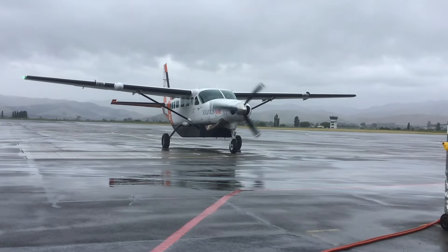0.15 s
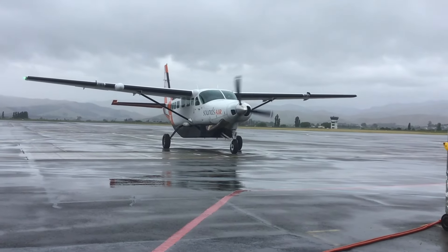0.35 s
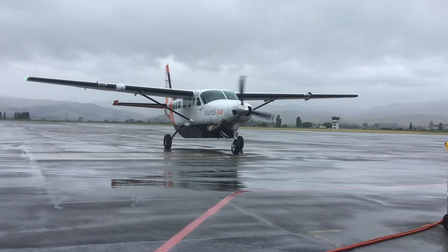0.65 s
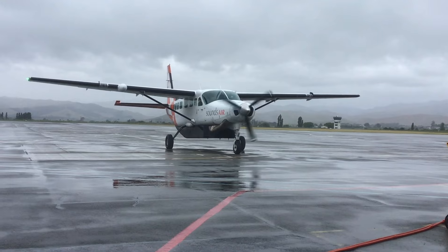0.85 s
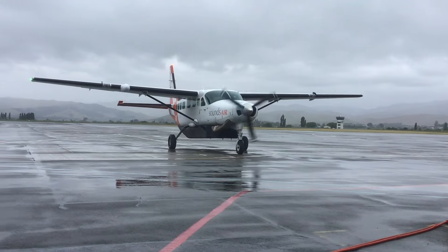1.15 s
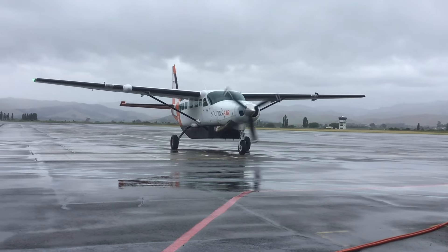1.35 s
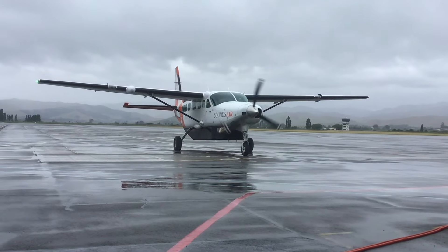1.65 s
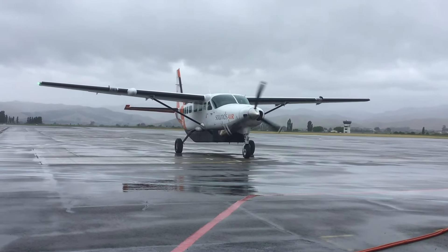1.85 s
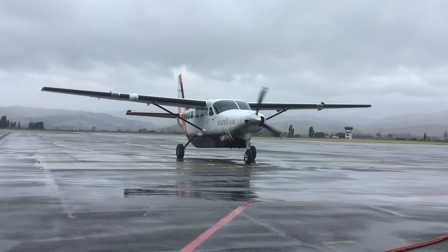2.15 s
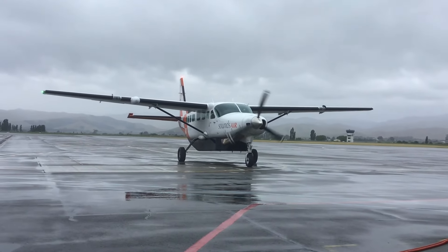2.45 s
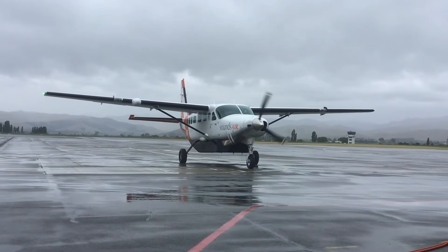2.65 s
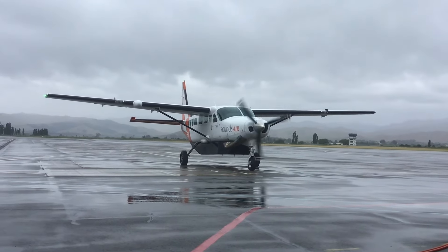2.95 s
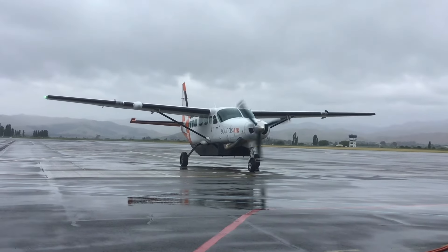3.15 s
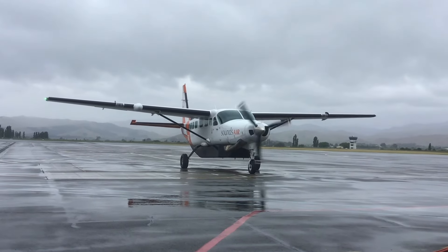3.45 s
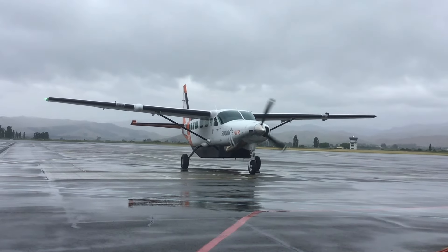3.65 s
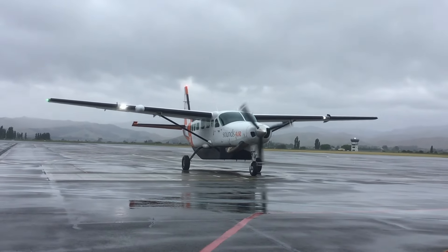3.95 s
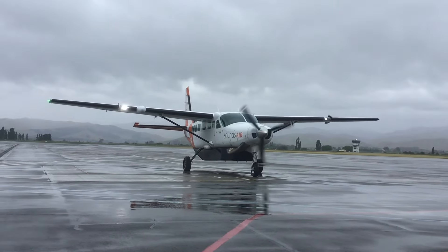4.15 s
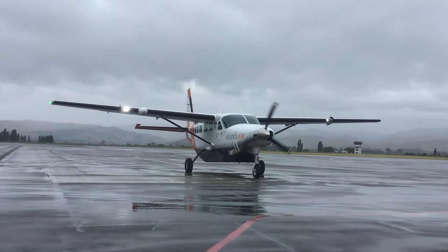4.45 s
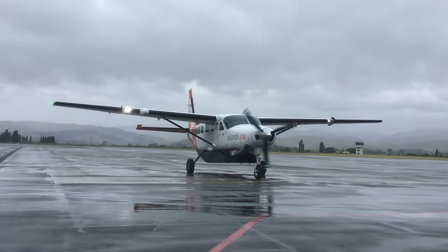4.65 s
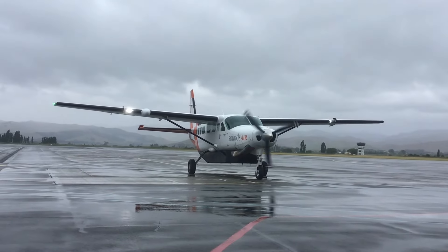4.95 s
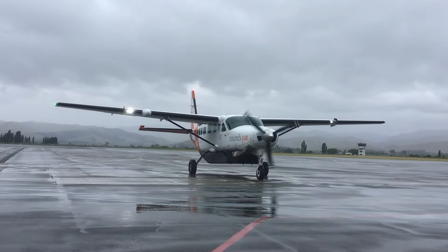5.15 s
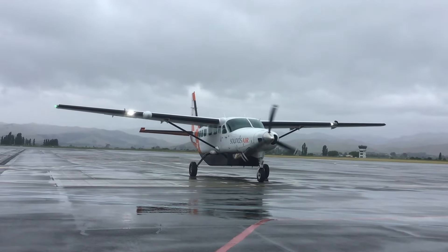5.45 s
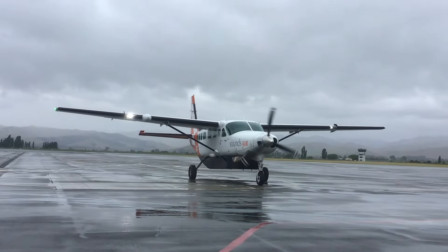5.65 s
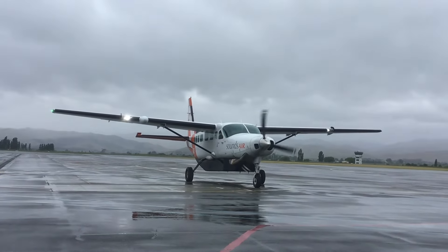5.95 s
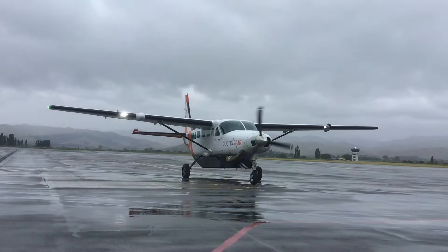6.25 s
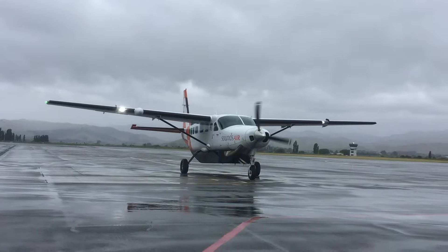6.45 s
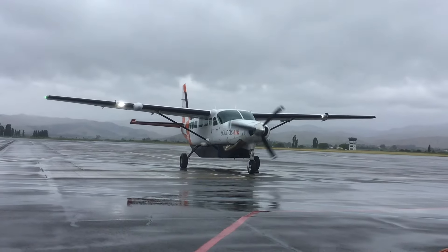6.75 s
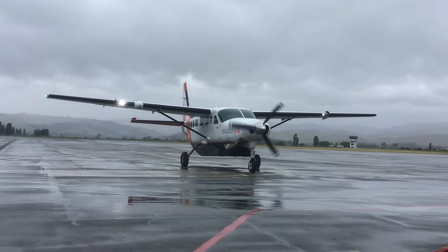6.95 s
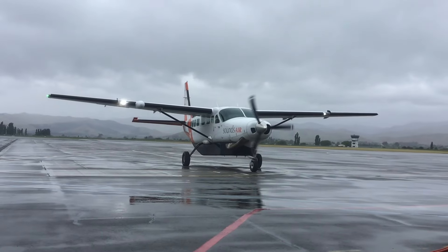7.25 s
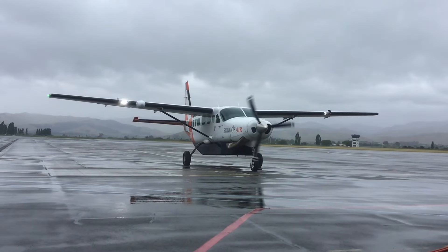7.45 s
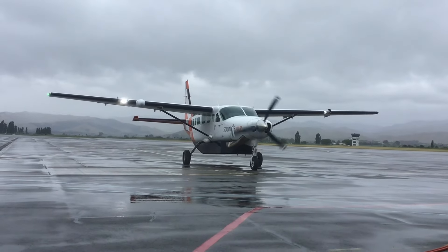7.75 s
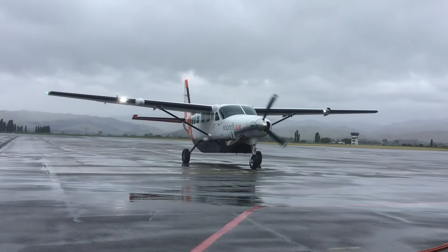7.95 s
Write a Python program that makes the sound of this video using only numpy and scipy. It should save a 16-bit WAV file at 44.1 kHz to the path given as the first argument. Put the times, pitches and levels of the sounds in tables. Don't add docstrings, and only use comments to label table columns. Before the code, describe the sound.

A small single-engine turboprop plane idles on an open wet apron, heard from some distance. Rapid propeller slaps merge into a low, uneven fluttering drone, under a hollow mid-high intake howl, rushing exhaust and hiss. A thin, high turbine whistle flickers in and out, clearest in the first few seconds. Light low wind buffets the microphone. The sound is continuous, essentially mono, with no start or stop.

```python
import sys
import numpy as np
from scipy import signal
from scipy.fft import rfft, irfft, next_fast_len
from scipy.io import wavfile
from scipy.ndimage import uniform_filter1d, map_coordinates

SR = 44100
rng = np.random.default_rng(int(sys.argv[2]) if len(sys.argv) > 2 else 0)


def elevation(decibels):
    levels = np.asarray(decibels, float)
    return 10 ** (levels / 20)


def to_wav(sig):
    pcm = np.clip(np.atleast_2d(sig), -1, 1) * 32767
    pcm = np.round(pcm).astype(np.int16)
    wavfile.write(sys.argv[1], SR, pcm.T)


N = 356769

# (time [s], level [dB])
WIND_LEVEL = [(0.0, -43), (0.45, -46), (0.47, -35.5), (1.13, -42), (1.45, -50), (1.65, -40), (2.7, -42.5),
              (3.5, -42), (4.03, -50), (5.61, -44), (6.06, -51), (8.09, -46)]
# (frequency [Hz], density [dB per Hz])
WIND_SPECTRUM = [(30, -1), (42, -6), (70, 7.5), (110, -1.5), (200, 2.5), (400, -61)]
# (middle [s], low edge [Hz], high edge [Hz], level [dB])
STRAY_BANDS = [
    (4.372, 5000, 6500, -41),
    (4.396, 7500, 9200, -45),
    (4.558, 8200, 9900, -45),
    (6.392, 6100, 7800, -42),
    (6.808, 4100, 5400, -36),
]

# (frequency [Hz], width [Hz], level [dB])
DUCT_MODES = [(1790, 50, -8), (1915, 40, -4.5), (2070, 80, -10), (2200, 80, -7), (2315, 70, -1.5),
              (2390, 50, -8), (2488, 40, 0), (2575, 70, -2), (2725, 60, -4.5), (2815, 45, -8),
              (2968, 45, -13), (3168, 65, -11.5), (3560, 80, -19), (4240, 120, -17)]
# (middle [s], length [s], gain [dB])
DUCT_SWELLS = [(.05, 0.24, 6), (.3, .15, -1.5), (.6, .2, 1), (1.75, .2, -1), (2.1, .15, 4), (2.5, .2, -3),
               (3.15, .15, -3), (3.4, .2, -2), (4.15, .25, 1), (4.55, .1, 3), (4.95, .2, -1.5),
               (5.6, .15, -1.5), (5.85, 0.17, 1), (6.5, 0.42, 1.5), (6.9, 0.28, 1), (7.15, 0.062, -2.5),
               (7.55, .25, -2), (7.9, .25, 1)]
# (time [s], share [0-1])
INTAKE_FACING = [
    (0, 0.36),
    (.6, 1),
    (1.05, 0.52),
    (2.3, 0),
    (2.9, 0.7),
    (3.7, 0.73),
    (4, 0.99),
    (7.3, 1),
    (7.6, 0.9),
    (8.09, 0.93),
]
# (frequency [Hz], density [dB per Hz])
ROAR_SPECTRUM = [(820, -56), (1400, -18), (1610, -18.5), (1860, -5.5), (2280, -3), (2560, -10),
                 (3360, -6.5), (4580, -5), (4930, -11), (5400, -14), (7020, -27), (11900, -120)]
SAG_TIMES = (6.0, 6.6, 7.1, 7.7)
SAG_GAINS = (-0.13, -4.5, -1.7, -0.65)
# (time [s], level [dB])
RASP_LEVEL = [(0, -41), (.25, -43), (.6, -44), (.75, -60), (1.05, -50), (1.2, -38), (1.45, -65),
              (1.75, -50), (1.9, -46), (2.9, -42), (3.3, -42), (4.5, -36), (4.95, -39.5), (5.9, -37),
              (6.5, -38), (7.1, -37.5), (7.6, -40), (8.09, -39)]
# (frequency [Hz], density [dB per Hz])
HISS_SPECTRUM = [(3060, -16.5), (5200, -3), (5800, -1.5), (6610, 0), (8390, -6), (10000, -1.5),
                 (10500, -4.5), (12800, -21), (14400, -21), (15200, -23), (15700, -24.5)]
# (middle [s], length [s], gain [dB])
TREBLE_GUSTS = [(.14, 0.12, 2), (.41, 0.21, 3.5), (.67, 0.1, -5), (.8, 0.16, -1.5), (.08, .1, -0.5),
                (1.17, .08, -1.5), (1.78, .08, -2.5), (2.43, 0.29, -1), (7.24, .08, 1), (5.99, .2, 0.7),
                (.33, .08, 1), (1.15, 0.51, 1.5), (1.45, 0.17, 1), (1.62, 0.057, 2), (1.85, 0.21, -2),
                (2.2, 0.19, -2.5), (2.72, 0.14, 3), (3.03, 0.14, 0), (3.2, 0.078, 4.5), (3.45, 0.42, -1.5),
                (3.78, 0.23, 2), (4.1, .2, 0.5), (4.62, 0.3, 3), (4.9, .15, -1.5), (5.05, 0.13, 2),
                (5.58, 0.16, -0.5), (5.78, 0.18, 2), (6.05, 0.36, 2), (6.4, 0.14, -1), (6.75, 0.23, 2),
                (7.1, .2, 0.5), (7.4, 0.26, 1.5), (7.85, 0.18, -1.5)]
# (middle [s], length [s], gain [dB])
TREBLE_SHIMMER = [(0.66, 0.08, 5), (0.93, 0.08, -2.9), (1.13, 0.12, 1.9), (1.56, 0.12, 2), (2.09, 0.3, 1),
                  (2.3, 0.08, 4), (2.59, 0.08, 0.5), (2.69, 0.08, -2.6), (3.04, 0.08, -4.5),
                  (4.09, 0.08, -5.4), (4.24, 0.08, 2.1), (4.43, 0.12, -1), (4.81, 0.12, -1),
                  (5.16, 0.12, 2), (5.36, 0.12, -2.4), (5.9, 0.08, -2.7), (6.29, 0.3, -2.2),
                  (6.65, 0.2, -1), (7.09, 0.08, -2.5), (7.31, 0.12, -2.4)]

SPOOL_HZ, CLIMB_HZ_PER_S, GOVERNED_HZ = 4958, 5.05, 4979.5
# (middle [s], length [s], level [dB])
TONE_SPELLS = [(.18, 0.2, -37.5), (1.15, 0.55, -36), (1.62, 0.12, -35), (2.02, .1, -35), (2.25, 0.36, -34),
               (2.52, .2, -38), (2.8, 0.36, -32.5), (3.04, .16, -34), (3.35, 0.26, -38), (3.9, 0.12, -50),
               (4.25, .36, -40.5), (5.05, 0.73, -43), (5.8, 0.32, -45), (6.25, 0.15, -43), (7.45, 0.3, -41),
               (7.95, 0.55, -42)]
# (middle [s], length [s], level [dB])
OVERTONE_SPELLS = [(.18, 0.18, -47), (.7, 0.16, -56), (1.3, .25, -49), (1.65, .15, -56), (2.6, 0.5, -45),
                   (3.35, 0.34, -52), (4.25, .3, -56), (5.1, 0.22, -55), (5.9, 0.38, -50), (6.45, .15, -60),
                   (6.8, .2, -53), (7.4, .3, -51), (8.0, 0.45, -50)]
# (multiple of blade rate, level [dB], share of the early family [0-1])
SIDEBAND_TONES = [
    (-3, -15, 0.6),
    (-2, -22, 0),
    (-1, -12, 0),
    (1, -5.5, 0.84),
    (2, -14, 1),
    (2, -13, 0.3),
]
# (middle [s], length [s], level [dB])
EARLY_SPELLS = [
    (.42, .6, -33.5),
    (1.2, .3, -41),
    (1.65, 0.17, -52),
    (2.2, 0.68, -32.5),
    (2.9, 0.35, -34),
    (7.25, .3, -48),
]
# (middle [s], length [s], level [dB])
LATE_SPELLS = [
    (.2, .3, -49),
    (2.2, 0.93, -33),
    (4.25, 0.4, -34),
    (5.9, 0.41, -39),
    (6.5, 0.91, -34),
    (7.1, 0.66, -45),
    (7.92, 0.22, -28),
    (6.0, 1.5, -51),
]
# (width [Hz], level over the hiss [dB])
TONE_HAZE = [
    (170, -7),
    (180, -17.5),
    (190, -24.5),
]

# (time [s], rate [Hz])
BLADE_RATE = [(0.0, 44.721), (0.6, 44.785), (1.2, 44.847), (1.8, 44.873), (2.5, 44.869), (3.2, 44.855),
              (3.9, 44.937), (4.5, 45.16), (5.2, 45.426), (5.9, 45.562), (6.6, 45.487), (7.3, 45.293),
              (8.09, 45.084)]
# (time [s], load level [dB], blade tips over the load [dB])
PROPELLER_LOAD = [(0.0, -29, -15.5), (0.34, -19, -22.5), (0.85, -26, -22), (0.97, -22, -23.5),
                  (1.45, -20.5, -19.5), (2.1, -20.5, -23), (2.77, -22, -23), (3.04, -25.5, -16.5),
                  (3.74, -25, -22), (3.95, -22.5, -21), (4.4, -25, -22.5), (4.6, -30.5, -14.5),
                  (6.2, -29, -16.5), (6.6, -23.5, -17), (7.5, -21, -21), (7.65, -27, -15.5),
                  (7.8, -22, -17.5), (8.09, -19, -22)]
# (time [s], gustiness [0-1])
INFLOW_GUSTS = [(0, .9), (.3, .65), (.45, .65), (.52, 1.15), (.62, .8), (.72, .9), (.85, 1.25), (.95, .6),
                (2.2, .55), (3.7, .65), (3.9, .4), (4.45, .4), (4.6, .95), (6.3, .9), (6.5, .3), (8.09, .4)]
# (time [s], gain over their neighbours [dB])
HARD_EDDIES = [(0.117, 0), (0.274, 4.5), (0.341, 7.5), (0.452, 5), (0.564, 1), (1.523, 6.5), (1.568, 4.1),
               (1.791, 5.5), (2.214, 9), (2.482, 1), (2.571, 6), (2.727, 8), (2.816, 7), (2.883, 7),
               (3.039, 3), (3.15, 7), (3.195, 6), (3.239, 9), (3.373, 6), (3.418, 4), (3.64, 6), (3.752, 5),
               (3.819, 13), (3.93, 6), (4.108, 6.0), (4.285, 6.6), (4.463, 2), (4.573, 6), (4.839, 7),
               (4.861, 4.4), (5.169, -2), (5.257, -6), (5.323, -1), (5.433, 0), (5.763, 7), (5.983, -3),
               (6.027, 5), (6.356, 2), (6.554, 2), (7.016, 2), (7.391, 4.9), (7.435, 4), (7.634, 4),
               (7.723, 3), (7.856, 0)]
# (frequency [Hz], level [dB])
PULSE_SPECTRUM = [(30, -60), (50, -22), (90, -6.5), (135, -3.5), (180, 1), (220, 0), (320, 1), (365, -2),
                  (410, -21.5), (500, -14.5), (580, -14), (800, -15.5), (1000, -27.5), (1600, -33.5),
                  (3000, -58)]
# (frequency [Hz], density [dB per Hz])
WASH_SPECTRUM = [(41, -41), (70, -20), (160, -0.5), (347, -4.5), (376, -2.5), (408, -3.5), (442, -11.5),
                 (532, -3.5), (625, -2.5), (1200, -13.5), (1590, -15.5), (1700, -13.5), (2210, -45),
                 (3740, -120)]
# (middle [s], length [s], frequency [Hz], gain [dB])
FOCUSING_POCKETS = [(0.14, 0.08, 157, 7), (0.16, 0.06, 376, 8.6), (0.29, 0.44, 89, 9.5),
                    (0.3, 0.59, 193, 5), (0.41, 0.099, 236, 10.5), (0.68, 0.043, 325, 6),
                    (0.68, 0.07, 176, 4), (0.93, 0.08, 308, 6), (0.95, 0.65, 240, 5), (1.07, 0.16, 133, 13),
                    (1.24, 0.052, 156, 12), (1.49, 0.12, 288, 7.5), (1.5, 0.082, 143, 7),
                    (1.97, 0.37, 226, 3), (2.12, 0.34, 110, 7), (2.12, 0.28, 296, 9), (2.44, 0.061, 121, 9),
                    (2.79, 0.17, 242, 9.5), (2.98, 0.64, 329, 7.5), (3.32, 0.13, 210, 6),
                    (3.34, 0.7, 94, 4), (3.44, 0.47, 230, 5), (3.55, 0.1, 285, 5), (3.88, 0.18, 370, 8),
                    (3.9, 0.29, 193, 11), (4.23, 0.18, 169, 7.5), (4.25, 0.41, 334, 7),
                    (4.4, 0.14, 242, 14), (4.55, 0.43, 119, 17.5), (4.75, 0.092, 313, 11.5),
                    (4.92, 0.15, 196, 15.5), (5.11, 0.32, 130, 11.5), (4.9, .3, 362, 4.5),
                    (5.6, 0.13, 365, 7.5), (5.41, 0.19, 93, 8), (5.66, 0.38, 175, 6),
                    (5.78, 0.21, 233, 13.5), (5.86, 0.26, 159, 16), (6.21, 0.19, 126, 10),
                    (6.3, 0.12, 310, 9), (6.52, 0.13, 188, 14), (6.63, 0.31, 338, 9.5),
                    (6.79, 0.25, 274, 10.5), (6.98, 0.17, 360, 5.5), (7.32, 0.63, 118, 9),
                    (7.43, 0.76, 187, 3), (7.67, 0.13, 156, 11), (7.73, 0.06, 350, 7.5),
                    (7.79, 0.11, 298, 7.5)]
# (middle [s], length [s], frequency [Hz], gain [dB])
CANCELLING_POCKETS = [(0.25, 0.22, 223, -16), (0.28, 0.19, 105, -14), (0.46, 0.16, 258, -16),
                      (0.49, 0.093, 147, -17), (0.71, 0.1, 226, -13), (1.11, 0.12, 104, -18),
                      (1.16, 0.15, 352, -8), (1.29, 0.084, 230, -10), (2.05, 0.3, 309, -8.5),
                      (2.15, 0.13, 87, -10), (2.18, 0.055, 193, -12), (2.43, 0.79, 250, -1.5),
                      (2.55, .25, 355, -4), (2.86, 0.16, 129, -10), (2.96, 0.072, 291, -7),
                      (3.15, 0.23, 132, -14), (3.41, 0.06, 339, -8), (3.75, 0.095, 176, -31),
                      (3.9, 0.19, 165, -19), (4.23, 0.11, 322, -13), (4.33, 0.24, 104, -19),
                      (4.35, 0.16, 190, -19), (4.52, 0.11, 290, -5), (4.87, 0.33, 147, -8),
                      (5.25, 0.29, 292, -9), (5.83, 0.18, 194, -26), (6.59, 0.19, 166, -12),
                      (6.67, 0.13, 326, -6), (6.84, 0.28, 235, -13), (7.14, 0.1, 330, -9),
                      (7.25, 0.073, 184, -6), (7.44, 0.62, 91, -9.5), (7.73, 0.17, 147, -17),
                      (7.93, 0.055, 312, -12), (.8, 0.12, 140, -9), (.55, 0.086, 100, -14),
                      (5.95, 0.37, 310, -3), (.52, 0.17, 318, -3), (5.45, 0.13, 318, -1)]
# (middle [s], length [s], frequency [Hz], gain [dB])
SNAP_POCKETS = [(0.96, 0.15, 530, 7), (1.08, 0.13, 800, -12), (1.48, 0.4, 800, 0), (1.572, 0.12, 530, -8),
                (1.783, 0.28, 714, -4.5), (2.128, 0.16, 805, 3.6), (2.29, 0.25, 530, 1),
                (2.68, 0.15, 530, -0.5), (3.64, 0.46, 740, -3), (4.17, 0.15, 800, -3.3),
                (4.28, 0.15, 620, 2.3), (4.54, 0.15, 800, 3), (5.03, 0.15, 530, 2), (5.13, 0.4, 710, -9),
                (5.51, 0.13, 530, -3.7), (5.72, 0.14, 623, 2.5), (5.892, 0.13, 710, 4.5),
                (6.09, 0.13, 800, -10), (6.09, 0.27, 530, -7), (6.53, 0.25, 670, 2.5),
                (6.76, 0.14, 710, -1), (6.96, 0.18, 530, -0.5), (7.11, 0.15, 710, -1.5),
                (7.29, 0.17, 800, 4.5), (7.534, 0.45, 533, -3.5), (8.03, 0.13, 530, -0.5)]
SNAP_CENTRES = (530, 620, 710, 800)
SNAP_REACH_HZ, POCKET_REACH_HZ, BLADE_HZ = 90, 27, 45
FRAME = 64


def unit(x):
    return x / np.sqrt(np.mean(x ** 2) + 1e-20)


def along(points, hz):
    f, v = np.transpose(points)
    return np.interp(np.log(hz + 1), np.log(f + 1), v)


def curves(rows):
    s, *columns = np.transpose(rows)
    return [np.interp(np.arange(N) / SR, s, column) for column in columns]


def wobble(rate):
    return map_coordinates(rng.standard_normal(1000), [np.arange(N) * rate / SR])


def filtered(x, response):
    m = next_fast_len(N + SR // 2)
    return irfft(rfft(x, m) * response(np.fft.rfftfreq(m, 1 / SR)), m)[..., :N]


def rush(gain, patchy_db):
    z = signal.stft(rng.standard_normal(N), nperseg=512)[2]
    field = uniform_filter1d(rng.standard_normal(z.shape), size=6, axis=0)
    field = uniform_filter1d(field, size=12, axis=1)
    patchy = signal.istft(z * elevation(patchy_db * unit(field)), nperseg=512)[1][:N]
    return unit(filtered(patchy, gain))


def between(hz, lo_hz, hi_hz):
    def edge(corner_hz):
        return np.clip(.5 + 4 * np.log((hz + 1) / corner_hz), 0, 1)
    return edge(lo_hz) - edge(hi_hz)


def spells(rows):
    s, length, db = np.transpose(rows)[:, :, None]
    t = np.arange(0, N, FRAME) / SR
    return np.exp(-.5 * (2.36 * (t - s) / length) ** 2), db


def per_sample(values):
    return np.repeat(values, FRAME)[:N]


def heard_db(rows, between_db):
    bell, db = spells(rows)
    return per_sample(20 * np.log10(elevation(between_db) + np.sum(elevation(db) * bell, axis=0)))


def gust_db(rows=TREBLE_GUSTS):
    bell, db = spells(rows)
    return per_sample(np.sum(db * bell, axis=0))


def pockets_db(hz, rows=list(FOCUSING_POCKETS) + list(CANCELLING_POCKETS), reach_hz=POCKET_REACH_HZ):
    rows = np.array(rows)
    bell, _ = spells(rows[:, :3])
    reach = np.exp(-.5 * ((rows[:, 2] - hz) / reach_hz) ** 2)
    return per_sample((rows[:, 3] * reach) @ bell)


def turns():
    return np.cumsum(curves(BLADE_RATE)[0]) / SR + .76


def chop(depth_db, lead):
    return elevation(depth_db * np.cos(2 * np.pi * (turns() + lead)))


def stray_noise():
    t = np.arange(N) / SR
    length_s = .046
    side = np.zeros(N)
    for s, lo, hi, db in STRAY_BANDS:
        noise = filtered(rng.standard_normal(N), lambda hz: (hz > lo) & (hz < hi))
        fade = np.clip(3 - 6 * np.abs(t - s) / length_s, 0, 1)
        side += elevation(db - 2) * fade * unit(noise)
    return np.array([side, -side])


def wind():
    level_db = curves(WIND_LEVEL)[0] + 8.0 + 0.57 * wobble(2.7)
    return elevation(level_db) * rush(lambda hz: elevation(along(WIND_SPECTRUM, hz)), patchy_db=-2.0)


def duct_response(hz):
    return np.sqrt(sum(elevation(2 * db) / (1 + (2 * (hz - centre) / width) ** 2) ** 1.37
                       for centre, width, db in DUCT_MODES))


def intake_howl(facing, sag_db):
    def ringing(lo_hz, hi_hz, patchy_db):
        return rush(lambda hz: duct_response(hz) * between(hz, lo_hz, hi_hz), patchy_db)

    low_db = -37.5 + 0.87 * sag_db + 0.68 * wobble(1.44)
    middle_db = -39.0 + 5.15 * facing
    high_db = -39.5 + 7.6 * facing + 0.87 * wobble(3.17) + gust_db(DUCT_SWELLS)
    howl = elevation(low_db) * ringing(100, 2190, patchy_db=0.5)
    howl += elevation(middle_db) * ringing(2080, 2370, patchy_db=1.5)
    howl += elevation(high_db) * ringing(2310, 30000, patchy_db=1.3)
    return chop(1.44, lead=0.034) * howl


def exhaust(facing, sag_db):
    def hissing(lo_hz, hi_hz, patchy_db):
        return rush(lambda hz: elevation(along(HISS_SPECTRUM, hz)) * between(hz, lo_hz, hi_hz), patchy_db)

    roar_db = -33.5 - 1.7 * facing + sag_db + 0.6 * wobble(3)
    roar = rush(lambda hz: elevation(along(ROAR_SPECTRUM, hz)), patchy_db=1.5)
    roar = elevation(roar_db) * chop(0.68, lead=0.36) * roar
    rasp_db = curves(RASP_LEVEL)[0] + 0.44 * gust_db()
    rasp = elevation(rasp_db) * rush(lambda hz: 1 / (1 + ((hz - 4550) / 420) ** 4), patchy_db=3.0)
    hiss = elevation(-36.5 + 1.02 * gust_db()) * hissing(100, 9900, patchy_db=1.73)
    sizzle_db = -49.0 + 1.3 * np.minimum(gust_db(), 2.4) + 0.98 * gust_db(TREBLE_SHIMMER) + 0.89 * wobble(20)
    sizzle = elevation(sizzle_db) * hissing(10970, 30000, patchy_db=2.0)
    gusts = elevation(0.42 + 0.34 * wobble(9.8)) * chop(0.94, lead=0.71)
    return roar + rasp + gusts * (hiss + sizzle)


def gas_stream():
    facing = curves(INTAKE_FACING)[0]
    sag_db = np.interp(np.arange(N) / SR, SAG_TIMES, SAG_GAINS)
    return intake_howl(facing, sag_db) + exhaust(facing, sag_db)


def compressor():
    hz = np.minimum(SPOOL_HZ + CLIMB_HZ_PER_S * np.arange(N) / SR, GOVERNED_HZ)
    phase = 2 * np.pi * np.cumsum(hz) / SR
    tone_db = heard_db(TONE_SPELLS, -66)
    faint = np.clip((-37 - tone_db) / 7, .12, 1)
    out = elevation(tone_db + 1.6 * faint * wobble(22)) * np.sin(phase + 0.4 * faint * wobble(60))
    second_db = heard_db(OVERTONE_SPELLS, -55.5) + 3.2 * wobble(25)
    out += elevation(second_db) * np.sin(2 * phase + 0.8 * wobble(40))

    early_level, late_level = elevation(heard_db(EARLY_SPELLS, -86)), elevation(heard_db(LATE_SPELLS, -86))
    for k, db, early in SIDEBAND_TONES:
        flicker = elevation(db + 1.6 * wobble(24)) * (early * early_level + (1 - early) * late_level)
        beside = phase + 2 * np.pi * k * turns() + 0.85 * wobble(25)
        out += flicker * (np.sin(beside) + elevation(-18) * np.sin(beside + phase))

    for k, (width_hz, db) in enumerate(TONE_HAZE, 1):
        smear = rush(lambda f: 1 / (1 + (2 * f / width_hz) ** 2), patchy_db=-1.0)
        haze_db = db - 35.0 + 0.56 * (gust_db() + 0.5) + 0.93 * wobble(6.1)
        out += elevation(haze_db) * smear * np.sin(k * phase)
    return np.sqrt(2) * out


def blade_pulse(hz, lo_hz, hi_hz):
    sweep = np.exp(-1j * 10.5 * np.log(hz / 80 + 1))
    return elevation(along(PULSE_SPECTRUM, hz)) * between(hz, lo_hz, hi_hz) * sweep


def passes(lo_hz, hi_hz, scatter_db, jitter_s, echo_db, eddy=0):
    at = np.flatnonzero(np.diff(np.floor(turns())))
    gusty = curves(INFLOW_GUSTS)[0][at]
    chance = np.clip(rng.standard_normal((len(at), 2)), -2, 2) * np.minimum(gusty, .8)[:, None]
    wander_s = jitter_s * (chance[:, 0] + 3.8 * gusty * wobble(3)[at])
    start = at + np.round(wander_s * SR).astype(int)

    echoes = []
    for lag_s, loss_db in [(.0075, 2.5), (.0135, -2), (.0182, -6.5)]:
        size = elevation(echo_db + loss_db) * np.tanh(wobble(5.5)[at]) * (0.33 + .6 * gusty)
        echoes.append((lag_s, size))
    shared = np.sqrt(1 + sum(size ** 2 for _, size in echoes))

    hard_s, hard_db = np.transpose(HARD_EDDIES)
    cuts = np.abs(at[:, None] / SR - hard_s) < .009
    cut_db = eddy * np.minimum(13, cuts @ hard_db)
    train = np.zeros(N + SR)
    train[np.maximum(start, 0)] = elevation(scatter_db * chance[:, 1] + cut_db) / shared
    for lag_s, size in echoes:
        train[start + round(lag_s * SR)] += size / shared
    return unit(filtered(train[:N], lambda hz: blade_pulse(hz, lo_hz, hi_hz)))


def blade_slap(gusty):
    order = np.arange(3, 9)[:, None]
    body = passes(112, 458, scatter_db=3.0, jitter_s=0.00025, echo_db=-9)
    bands = filtered(body, lambda hz: np.clip(1 - np.abs(np.clip(hz / BLADE_HZ, 3, 8) - order), 0, 1))
    bands = signal.hilbert(bands, next_fast_len(N))[:, :N]
    slap = np.zeros(N)
    for k, band in enumerate(bands, 3):
        slide_rad = 1.1 * gusty ** 2 * wobble(9) - .3
        slap += elevation(pockets_db(k * BLADE_HZ)) * (band * np.exp(1j * slide_rad)).real
    return slap


def focused(tips):
    centre = np.array(SNAP_CENTRES)[:, None]
    slices = filtered(tips, lambda hz: np.clip(1 - np.abs(np.clip(hz, 530, 800) - centre) / SNAP_REACH_HZ, 0, 1))
    return sum(elevation(1.67 * pockets_db(hz, SNAP_POCKETS, SNAP_REACH_HZ)) * part
               for hz, part in zip(SNAP_CENTRES, slices))


def propeller():
    load_db, tips_db = curves(PROPELLER_LOAD)
    gusty = curves(INFLOW_GUSTS)[0]
    drone_db = load_db - 12.5 + pockets_db(87) + 0.4 * wobble(8)
    drone = elevation(drone_db) * passes(20, 132.3, scatter_db=-2.0, jitter_s=0.00013, echo_db=-9.0)
    slap = elevation(load_db - 1.73) * blade_slap(gusty)

    tips = focused(passes(480, 890, scatter_db=2.5, jitter_s=.00008, echo_db=-10, eddy=1.0))
    tips += elevation(-7.5) * passes(860, 5000, scatter_db=3.5, jitter_s=.00025, echo_db=-4, eddy=.45)
    snap = elevation(load_db + tips_db + 8.0 + 1.0 * wobble(3.9)) * tips

    air = chop(3.1, lead=-0.028) * rush(lambda hz: elevation(along(WASH_SPECTRUM, hz)), patchy_db=1.5)
    air_db = -30.5 + 0.095 * (load_db + 18) + 2 * (gusty - 0.79) + 0.22 * wobble(9)
    return drone + slap + snap + elevation(air_db) * unit(air)


def scene():
    return np.tile(wind() + gas_stream() + compressor() + propeller(), (2, 1))


def band_limit(x):
    return signal.sosfilt(signal.butter(12, 15730, fs=SR, output="sos"), x)


def record(dry):
    heard = filtered(dry + stray_noise(), lambda hz: 1 / (1 + (38 / (hz + 1)) ** 6))
    return band_limit(heard)


dry = scene()
out = record(dry)
to_wav(out)
```